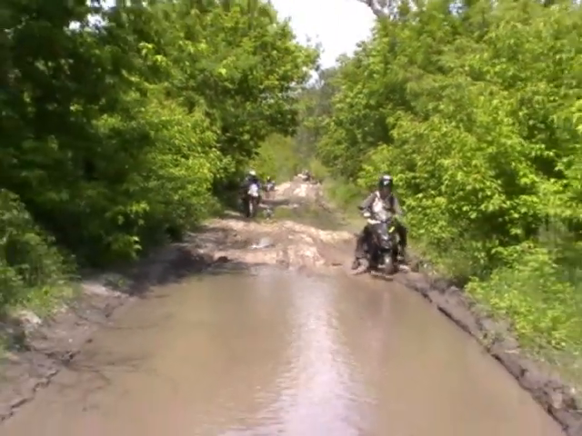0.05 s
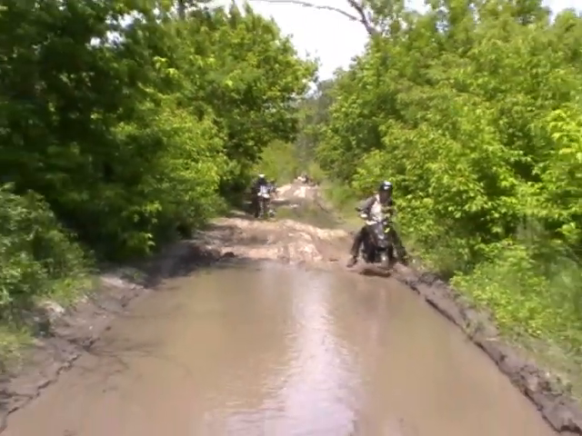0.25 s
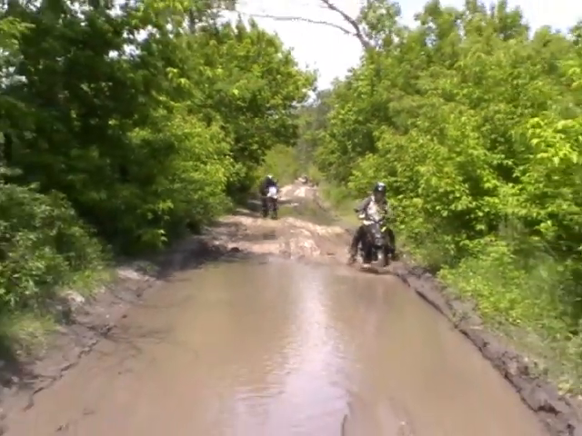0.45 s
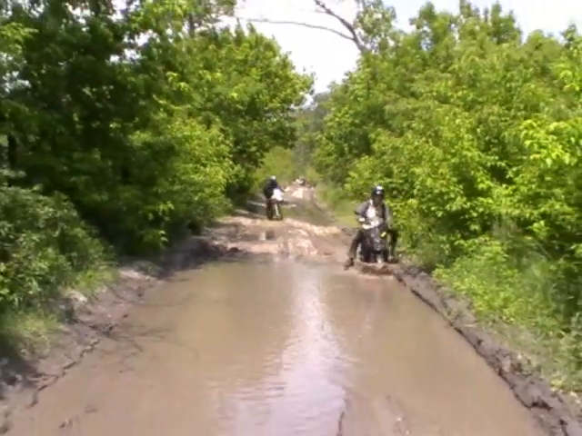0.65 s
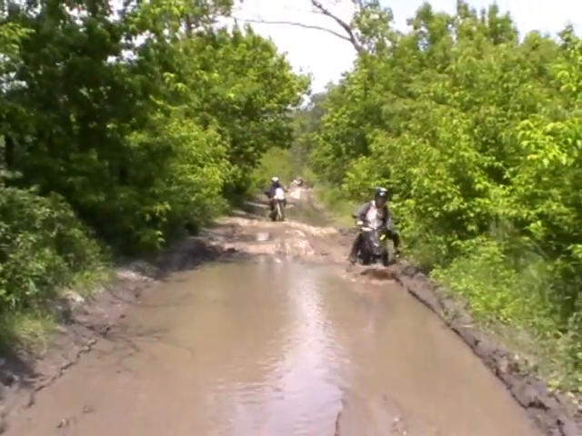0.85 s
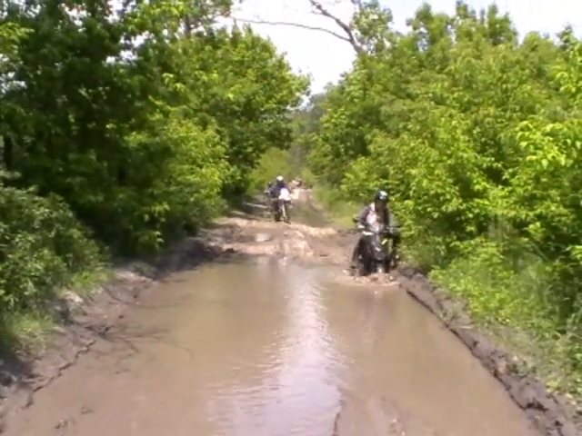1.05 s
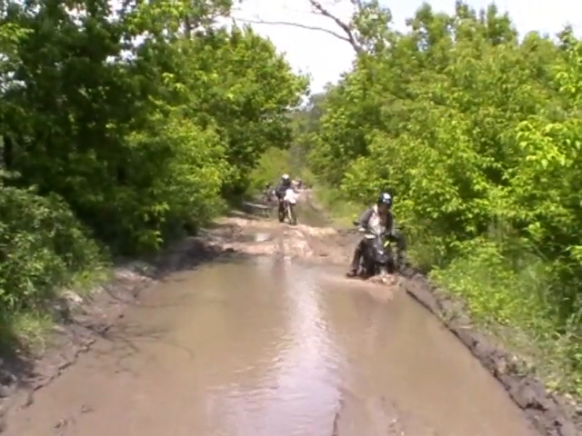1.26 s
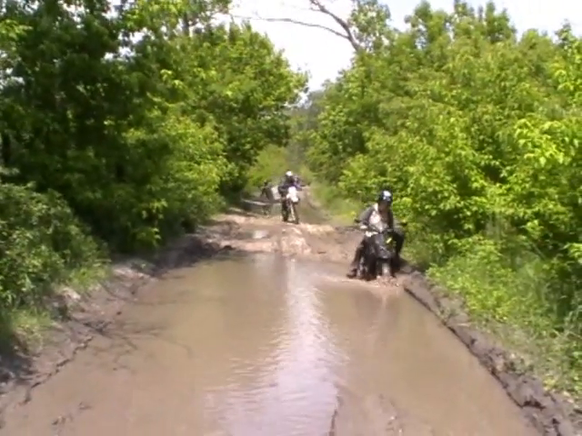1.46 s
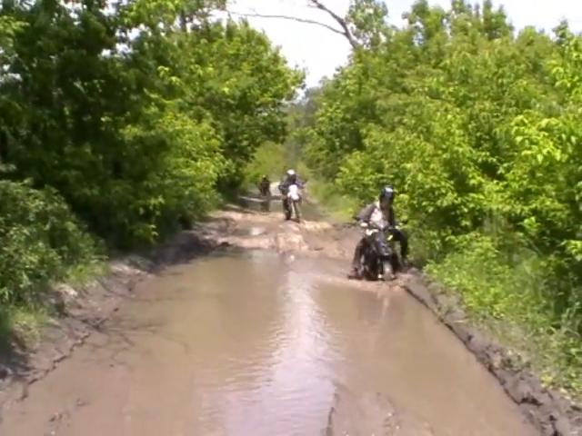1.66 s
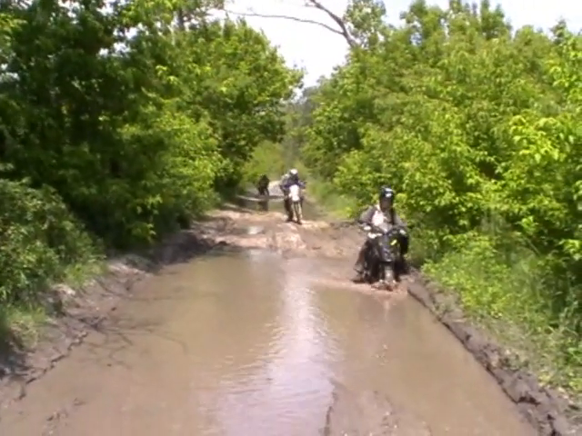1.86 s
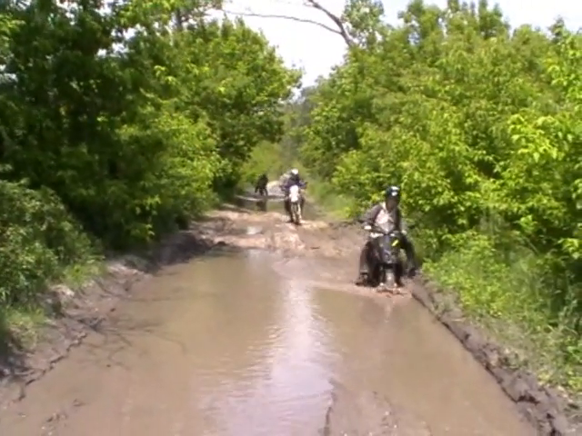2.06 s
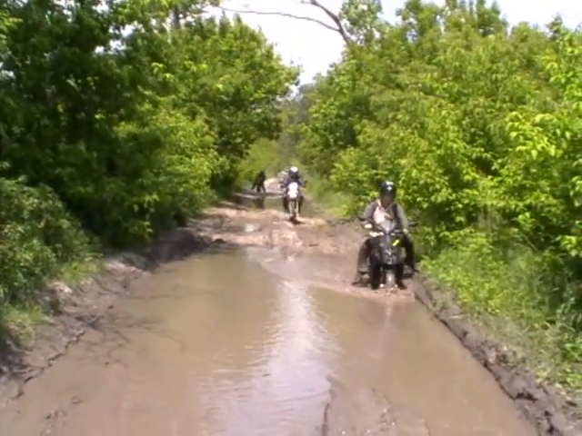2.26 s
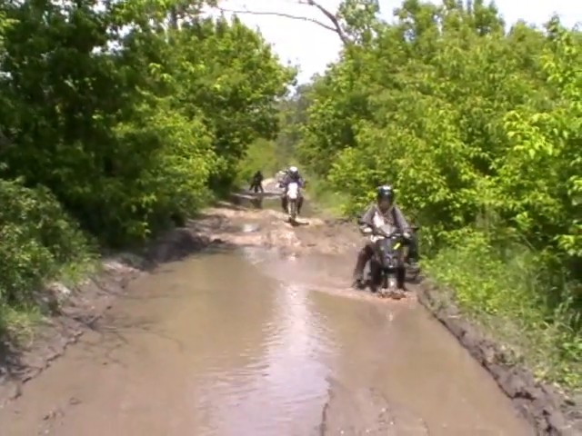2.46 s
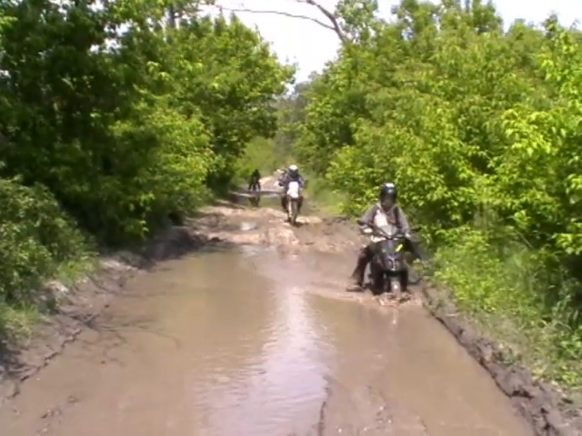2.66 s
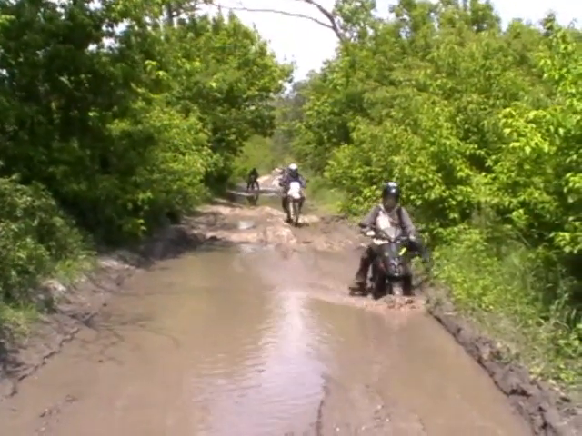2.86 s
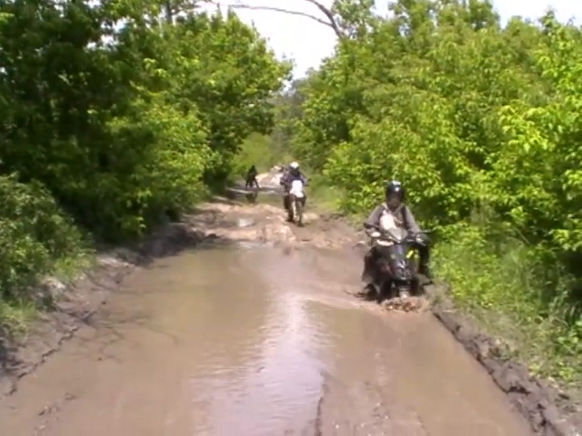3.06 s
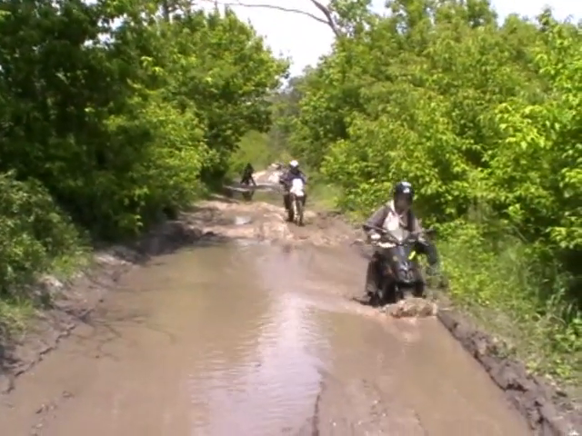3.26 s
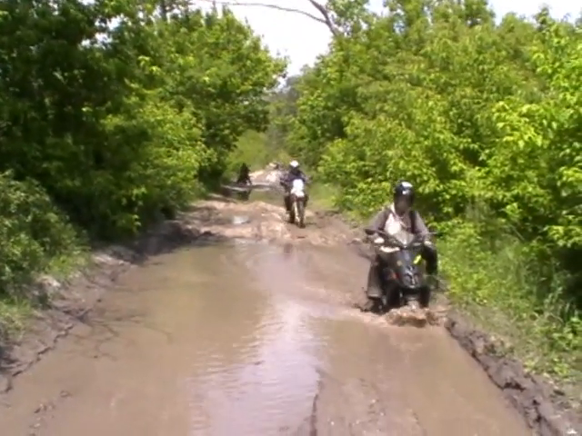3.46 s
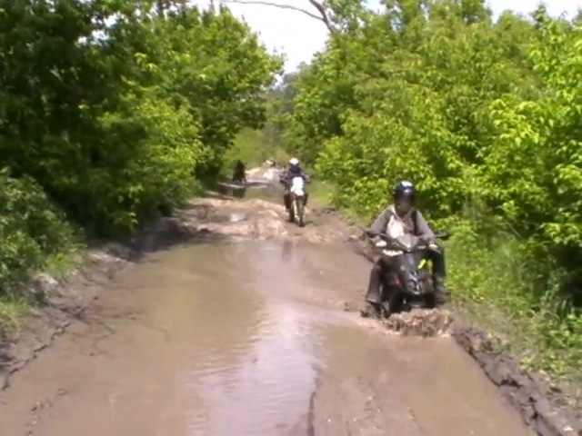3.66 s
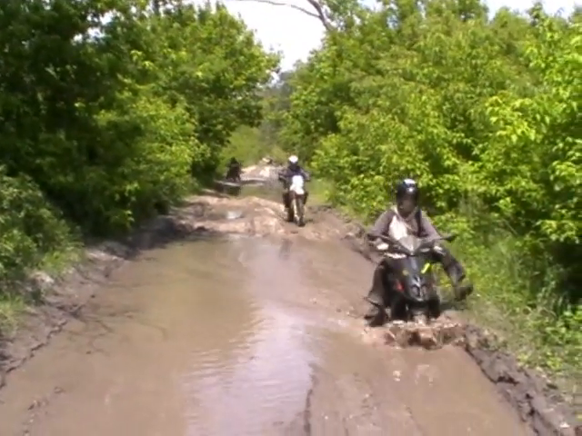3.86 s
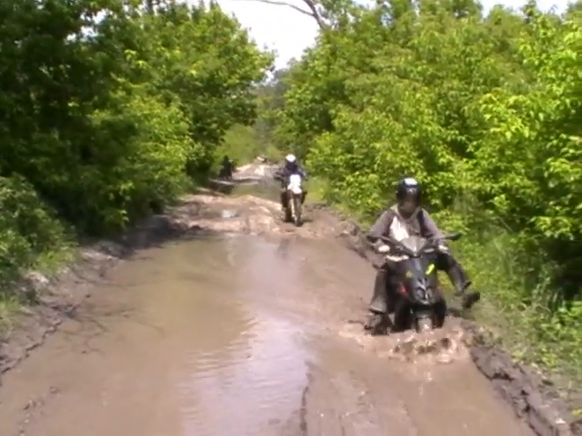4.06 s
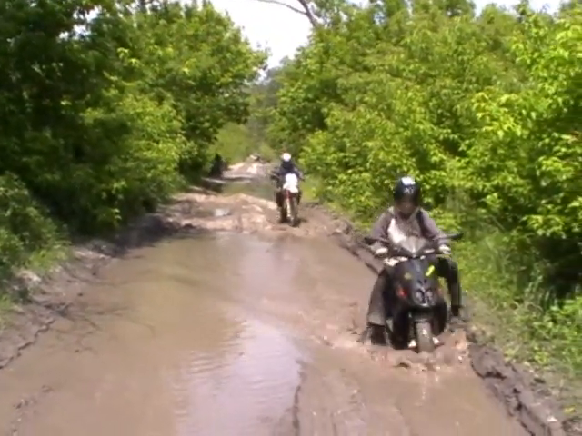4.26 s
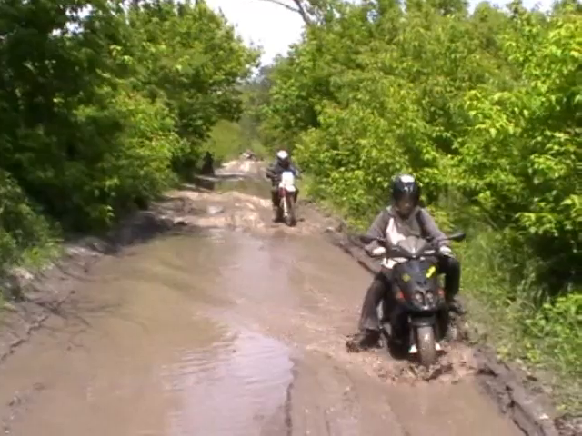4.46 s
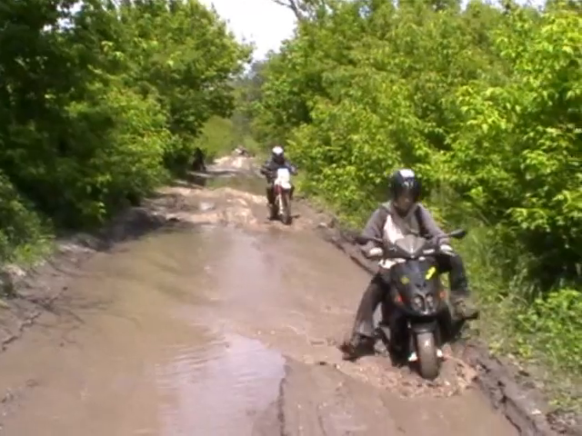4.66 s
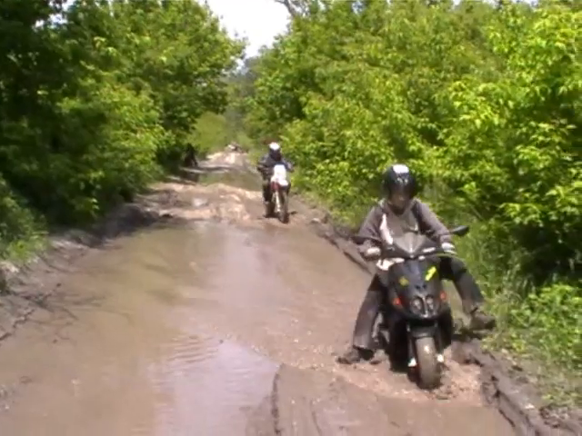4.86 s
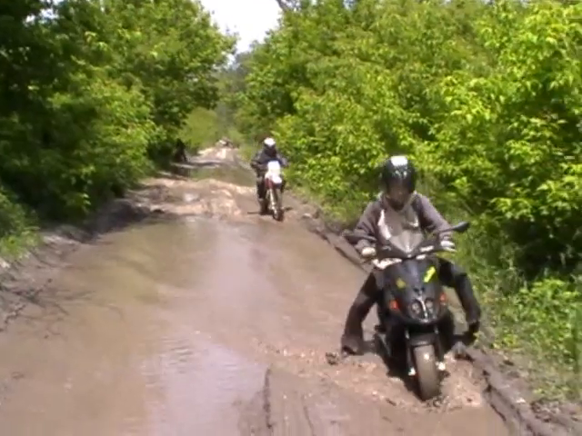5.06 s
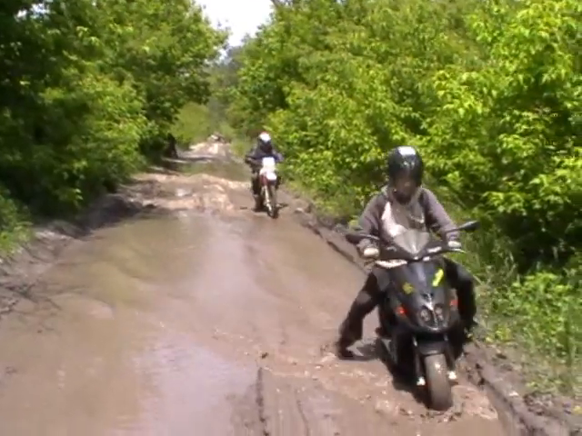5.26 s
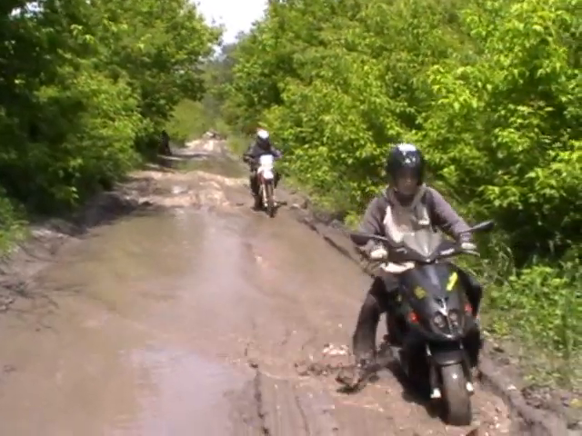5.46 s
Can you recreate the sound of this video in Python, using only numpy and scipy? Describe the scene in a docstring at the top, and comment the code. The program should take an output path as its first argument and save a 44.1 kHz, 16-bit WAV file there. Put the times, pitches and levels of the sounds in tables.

```python
"""On a forest track, a two-stroke scooter wades through a long muddy puddle towards two microphone ports.
Its silencer booms on the five lowest crank orders, as sine tones; pulses locked to the crank make the
exhaust rasp and the intake bark, and random clicks clatter on the casing.
Filtered noise and gliding bubbles churn round the wheels, and fine clicks and hiss make the spray.
A trail bike putters further back as pulses ringing a pipe, and the bushes scatter a short diffuse tail."""
import sys
import numpy as np
from scipy import signal
from scipy.fft import rfft, irfft
from scipy.io import wavfile
from scipy.ndimage import uniform_filter1d

SR = 44100
rng = np.random.default_rng(int(sys.argv[2]) if len(sys.argv) > 2 else 0)


def digitize_waveform(pressure):
    """Quantize a signal to 16-bit integers and store it at the path in sys.argv[1].

    Rows of a 2-D input are taken as channels; values are limited to [-1, 1].
    """
    field = np.atleast_2d(pressure).T
    bounded = np.clip(field, -1, 1)
    quanta = np.round(bounded * 32767).astype(np.int16)
    wavfile.write(sys.argv[1], SR, quanta)


N = 243014

REFERENCE_M = 5  # distance at which the layer levels hold


def undb(db):
    """Decibels to gain."""
    return 10 ** (np.asarray(db) / 20)


def unit(x):
    """Scale to rms 1."""
    return x / np.sqrt(np.mean(x ** 2))


def curves(table):
    """Each column of a timed table, one value per sample."""
    seconds, *columns = np.transpose(table)
    return [np.interp(np.arange(N) / SR, seconds, column) for column in columns]


def colour(x, points):
    """Filter by (Hz, dB) points joined on a logarithmic frequency axis; rms 1."""
    hz, db = np.transpose(points)
    bins = np.maximum(np.arange(N // 2 + 1) * SR / N, 1)
    gain = undb(np.interp(np.log(bins), np.log(hz), db))
    return unit(irfft(rfft(x) * gain, N))


def resonate(x, hz, width_hz):
    """One resonance, gain 1 at its centre."""
    return signal.lfilter(*signal.iirpeak(hz, hz / width_hz, fs=SR), x)


def ring(x, modes):
    """Sum of (Hz, width Hz, dB) modes; two passes at twice the width give each steeper skirts."""
    total = 0
    for hz, width_hz, db in modes:
        once = resonate(x, hz, 2 * width_hz)
        total = total + undb(db) * resonate(once, hz, 2 * width_hz)
    return unit(total)


def walk(rate):
    """Smooth chance that changes about rate times a second; spread 1."""
    hold = max(int(SR / rate), 1)
    steps = np.repeat(rng.standard_normal(N // hold + 1), hold)
    return unit(uniform_filter1d(steps, hold)[:N])


def clicks(rate, spread_db):
    """Random tiny impacts, rate per second: many weak, a few strong."""
    hit = rng.random(N) < rate / SR
    size = undb(spread_db * np.minimum(rng.exponential(size=N), 4))
    return unit(hit * size * rng.choice([-1, 1], N))


def pulses(turns, scatter_db):
    """One pulse of uneven strength per whole turn, shared between two samples."""
    size = undb(scatter_db * rng.standard_normal(N))
    at = np.flatnonzero(np.diff(np.floor(turns)) > 0)
    # share of the step that lies past the whole turn
    late = (turns[at + 1] % 1) / (turns[at + 1] - turns[at])
    out = np.zeros(N)
    out[at] += size[:len(at)] * late
    out[at + 1] += size[:len(at)] * (1 - late)
    return out


def place(x, pan_db):
    """Set a source left (+) or right (-) by the level difference between the sides."""
    return x * undb(np.array([[pan_db], [-pan_db]]) / 2)


def order_levels(hz, throttle, metres):
    """Levels of crank orders 2 to 5 in dB: each slides along the silencer's response as the speed changes."""
    # The exhaust note ahead of the silencer's response. Each row: time in seconds, level in dB.
    exhaust_level = [(0, -43.6), (.39, -41), (.58, -31), (1.05, -29.5), (1.7, -31), (2.55, -28.8),
                     (3.03, -26), (3.16, -23), (3.57, -27), (3.9, -21), (4.3, -24), (5.5, -22)]
    # What the silencer lets through. Each row: frequency in Hz, gain in dB.
    silencer_colour = [(115, -11), (140, -6.5), (160, -1), (172, -2), (205, -4.5), (240, -7.5), (280, -6),
                       (320, -9), (342, -12), (370, -14.3), (420, -24.5)]
    # Change from shut to full throttle, in dB for orders 2 to 5: load lifts 2, 4 and 5 and sinks 3.
    order_swing_db = [10.5, -15, 15.5, 14]
    # Change from the far end of the approach to the near one as the angle turns, in dB for orders 2 to 5.
    order_near_db = [-3.5, .5, 4, -8.5]
    # Depth of chance fading over the rippling water, in dB for orders 2 to 5.
    order_fade_db = [.15, .45, .8, 1.6]
    note_db, = curves(exhaust_level)
    at_hz, pass_db = np.transpose(silencer_colour)
    closeness = REFERENCE_M / metres
    closeness = (closeness - closeness.mean()) / np.ptp(closeness)
    levels = []
    for k, (swing_db, near_db, fade_db) in enumerate(zip(order_swing_db, order_near_db, order_fade_db), 2):
        silenced_db = note_db + np.interp(np.log(k * hz), np.log(at_hz), pass_db)
        balance_db = swing_db * (throttle - .5) + near_db * closeness
        levels.append(silenced_db + balance_db + fade_db * walk(7))
    return levels


def boom(turns, hz, order_db, flutter_db, uneven_db, first_order_db):
    """The silencer passes only the lowest crank orders; uneven burning makes them flutter."""
    resonance_hz, width_hz = 206, 28
    # order 1 follows the stronger of orders 2 and 3
    levels = [np.maximum(order_db[0], order_db[1]) + first_order_db] + order_db
    tones = 0
    for k, db in enumerate(levels, 1):
        # an order's phase turns as it crosses the silencer's main resonance
        lag = np.arctan(2 * (k * hz - resonance_hz) / width_hz)
        dispersion = 1.7 * k ** 2  # radians
        gain = undb(db + flutter_db * walk(45))
        tones = tones - gain * np.sin(2 * np.pi * k * turns - lag - dispersion)
    return np.sqrt(2) * tones * undb(uneven_db * walk(32))


def chambers(x, reflect):
    """Allpass echoes inside the silencer spread each crack over milliseconds without colouring it."""
    # Round trips of the silencer's chambers, in seconds.
    round_trips = [.0007, 0.00131, .0021]
    for trip in round_trips:
        taps = np.r_[1, np.zeros(int(trip * SR)), reflect]
        x = signal.lfilter(taps[::-1], taps, x)
    return x


def reflections(x, strength, count):
    """Paths by way of the rippling water and the banks come and go, so overtones swell and fade."""
    lags = (rng.uniform(0.00186, .03, count) * SR).astype(int)
    echoes = sum(walk(4.05) * np.r_[np.zeros(lag), x[:-lag]] for lag in lags)
    return unit(x + strength * echoes)


def port_cracks(turns, jitter, scatter_db, intake_db, echo):
    """The exhaust port cracks open once a turn and the intake half a turn later."""
    rough = turns + jitter * walk(160)
    exhaust = pulses(rough, scatter_db)
    intake = undb(intake_db) * pulses(rough + .5, scatter_db)
    return reflections(chambers(exhaust + intake, reflect=0.55), echo, count=5)


def rasp(cracks):
    """The port cracks leave the exhaust as a midrange buzz locked to the crank."""
    # Spectral shaping of the rasp. Each row: frequency in Hz, gain in dB.
    rasp_colour = [(330, -25), (490, -1.5), (670, 5.5), (850, 3), (1000, -4), (1300, -2), (1750, -9.5),
                   (2300, -40), (4200, -55)]
    return colour(cracks, rasp_colour)


def bark(cracks):
    """The firings ring the intake and the plastic cowling, heard from close by."""
    # Resonances of intake and cowling. Each row: frequency in Hz, nominal width in Hz, gain in dB.
    cowl_modes = [(886, 97.5, -3.5), (1046, 230, -7.5), (1362, 68, -7), (1647, 59, -4.5), (1912, 83, -4.5),
                  (3190, 120, -8.5), (4967, 84, -26)]
    return ring(cracks, cowl_modes)


def clatter(turns, depth, flicker_db):
    """Piston, belt and flung grit rattle the engine casing, a little harder around each firing."""
    # Spectral shaping of the casing. Each row: frequency in Hz, gain in dB.
    casing_colour = [(500, -21), (900, -4), (1250, 0.5), (1600, -3), (2000, -2), (2350, 2), (2620, -6),
                     (2820, -2), (3020, 3), (3300, -2), (3600, -9.5), (3900, -16), (4300, -32.5),
                     (6000, -31)]
    gate = 1 + depth * np.cos(2 * np.pi * turns)
    knocks = clicks(rate=9000, spread_db=2.5) * gate
    return colour(knocks, casing_colour) * undb(flicker_db * walk(30))


def surges():
    """Surges and lulls, in dB, as the wheels and the rider's boots plough through the water."""
    # Bell-shaped swells. Each row: peak in seconds, change of the spray in dB, time to fall to 1/e in seconds.
    plunges = [(0, 1.5, .07), (0.276, -3.5, 0.24), (1.1, 2, 0.47), (1.761, 2, 0.11), (2.878, 2, 0.074),
               (3.48, 3.5, 0.057), (3.72, 3.5, 0.05), (4.05, 4.5, 0.098), (4.16, 4.5, 0.043),
               (4.42, 2, 0.21)]
    t = np.arange(N) / SR
    return sum(db * np.exp(-((t - peak) / half) ** 2) for peak, db, half in plunges)


def bubbles(low_hz, high_hz, cycles, spread_db, count):
    """Air pockets that ring briefly, their pitch gliding up as they surface."""
    out = np.zeros(N)
    for when, pitch, chance in rng.random((count, 3)):
        hz = low_hz * (high_hz / low_hz) ** pitch
        start = int(when * N)
        t = np.arange(min(int(cycles / hz * SR), N - start)) / SR
        age = t * hz / cycles  # 0-1 over the bubble's life
        size = undb(-spread_db * np.log(max(chance, .03)))
        tone = np.sin(2 * np.pi * hz * t * (1 + age / 10))
        out[start:start + len(t)] += size * tone * np.exp(-np.log(100) * age)
    return unit(out)


def churn(turns, bubble_db, depth, unrest_db):
    """Muddy water boils round the wheels while exhaust gas puffs through it with each turn."""
    # Spectral shaping of the muddy water. Each row: frequency in Hz, gain in dB.
    water_colour = [(40, -30), (90, -8), (150, -1), (280, 2), (410, -8), (520, -4), (720, -3), (950, -7),
                    (1300, -16), (2200, -16), (4000, -36)]
    puffs = rng.standard_normal(N) * (1 + depth * np.cos(2 * np.pi * turns))
    gurgle = bubbles(low_hz=380, high_hz=1800, cycles=12, spread_db=2.5, count=1500)
    water = colour(puffs, water_colour) + undb(bubble_db) * colour(gurgle, water_colour)
    return unit(water) * undb(unrest_db * walk(22.32))


def spray(spray_db, mist_db, width_db, flicker_db):
    """Droplets patter back onto the puddle; a layer opposed between left and right widens them."""
    # Spectral shaping of the droplets. Each row: frequency in Hz, gain in dB.
    drop_colour = [(2500, -32), (4300, -3), (5050, 3.5), (5500, 3), (6200, 3.5), (7800, 1.5), (9500, 4.5),
                   (10600, 0), (13500, 2.5), (14200, -9), (16000, -15)]
    patter = clicks(rate=1800, spread_db=4.0)
    mist = undb(mist_db) * rng.standard_normal(N)
    drops = colour(patter + mist, drop_colour)
    side_colour = [(2000, 2.5), (3500, 3), (5000, 7.5), (9000, -0.5), (16000, -10)]
    sides = colour(clicks(rate=6000, spread_db=1.5), side_colour)
    both = place(drops, pan_db=1.5) + undb(width_db) * sides * np.array([[1], [-1]])
    return both * undb(spray_db + flicker_db * walk(30))


def spurts():
    """Short, bright hisses of flung water: noise with a sharp rise and a quick decay."""
    # Single spurts of fine spray. Each row: peak in seconds, level in dB, decay in seconds.
    hisses = [(.044, -53, .004), (.519, -51, .006), (2.141, -42.5, .008), (3.45, -52, .02)]
    # Spectral shaping of the hiss. Each row: frequency in Hz, gain in dB.
    hiss_colour = [(3000, -10), (6000, -6), (13300, 3), (16000, -12)]
    t, rise = np.arange(N) / SR, 0.0017  # s
    gain = 0
    for peak, db, decay in hisses:
        gain = gain + undb(db) * np.exp(-np.maximum((t - peak) / decay, (peak - t) / rise))
    return gain * colour(rng.standard_normal(N), hiss_colour)


def whine():
    """A thin, slightly unsteady gear tone, faintest after the first second."""
    # The gear tone. Each row: time in seconds, frequency in Hz, level in dB.
    gear_tone = [(0, 1750, -55), (.45, 1826, -57), (1, 1810, -66)]
    hz, db = curves(gear_tone)
    cycles = np.cumsum(hz * (1 + 0.00335 * walk(56))) / SR
    return np.sqrt(2) * undb(db) * np.sin(2 * np.pi * cycles)


def trail_bike():
    """A distant four-stroke on low throttle: lumpy firings ring its pipe."""
    # The bike behind. Each row: time in seconds, firing rate in Hz, level in dB before a 5 dB cut.
    putter = [(0, 32.8, -40.5), (.4, 33.54, -42), (1.2, 32.04, -38), (3, 33.89, -39), (5.51, 31.95, -46)]
    # Its exhaust resonances. Each row: frequency in Hz, nominal width in Hz, gain in dB.
    pipe_modes = [(523.4, 44, -1), (607, 37.5, 1), (746, 97, -8)]
    hz, db = curves(putter)
    firings = pulses(np.cumsum(hz * (1 + 0.0201 * walk(12))) / SR, scatter_db=-1.5)
    return ring(firings, pipe_modes) * undb(db - 5)


def bushes(x, t60, wet_db):
    """Leaves and trunks scatter a short diffuse tail (t60 in seconds), different at each ear."""
    t = np.arange(SR // 2) / SR
    tails = rng.standard_normal((2, len(t))) * np.exp(-np.log(1000) * t / t60)
    tails /= np.sqrt(np.sum(tails ** 2, axis=1, keepdims=True))
    return x + undb(wet_db) * signal.fftconvolve(x, tails, axes=1)[:, :N]


def scene():
    """Crank speed and throttle drive the engine; distance, revs and surges set how loud its layers are."""
    # The scooter's engine speed. Each row: time in seconds, firing rate in Hz.
    speed = [(0.0, 56.1), (0.14, 57.5), (0.4, 59.2), (0.6, 67.95), (0.8, 69.73), (1.27, 69.97),
             (1.55, 78.92), (1.84, 83.8), (2.15, 83.3), (2.53, 85.84), (2.75, 82.27), (3.1, 79.9),
             (3.35, 81.5), (3.53, 85.2), (3.67, 83.26), (3.9, 76.8), (4.0, 70.2), (4.1, 68.05),
             (4.26, 68.13), (4.47, 74.9), (4.66, 65.4), (4.99, 76.32), (5.2, 82.1), (5.51, 86.34)]
    # The rider's hand. Each row: time in seconds, throttle from 0 to 1.
    throttle_hand = [(0, 0.35), (1.26, 0.3), (1.42, 0.72), (1.82, 0.76), (2.58, 0.58), (2.76, 0.36),
                     (3.44, 0.28), (3.5, 0.55), (3.81, 0.25), (4.26, 0.47), (4.36, 0.59), (4.47, 0.66),
                     (4.55, 0.06), (4.73, 0.56), (5.1, 0.68), (5.5, 0.86)]
    # The approach. Each row: time in seconds, distance in metres.
    approach = [(0, 16.3), (2, 13.4), (3, 11.6), (4, 9.2), (5, 6.75), (5.5, 4.84)]
    # Midrange power locked to the firings. Each row: time in seconds, exhaust rasp 0-1, intake bark 0-1.
    load = [(0, 0, 0), (1.3, 0.45, 0), (1.8, 0.48, 0.01), (2.6, 0.4, 0.02), (3.1, 0.17, 0.03),
            (4.7, 0.17, 0.13), (5.05, 0.16, 0.32), (5.3, 0.12, 0.4)]
    hz, = curves(speed)
    metres, = curves(approach)
    throttle, = curves(throttle_hand)
    rasping, barking = curves(load)
    watery = 1 - rasping - barking

    # each layer: dB at the reference distance, 75 Hz and half throttle, then its rise in dB per Hz of revs
    near_db = 20 * np.log10(REFERENCE_M / metres)
    revs, surge_db, pull = hz - 75, surges(), throttle - .5
    rasp_db = -30 + near_db + 0.2453 * revs + 2.5 * pull
    bark_db = -31 + near_db + 0.28 * revs
    # surges reach the grit on the casing and the churning only in part
    clatter_db = -32 + near_db + 0.038 * revs + 0.5 * pull + 0.71 * surge_db
    churn_db = -30 + near_db + 0.0877 * revs + .25 * surge_db
    spray_db = -48 + near_db + 0.01 * revs + surge_db

    turns = np.cumsum(hz * (1 + 0.001875 * walk(40))) / SR
    orders = order_levels(hz, throttle, metres)
    low = boom(turns, hz, orders, flutter_db=0.59, uneven_db=0.38, first_order_db=-31.0)
    cracks = port_cracks(turns, jitter=0.0032, scatter_db=3.0, intake_db=-9.5, echo=0.25)
    edge = rasp(cracks) * np.sqrt(rasping) * undb(rasp_db)
    gulps = port_cracks(turns, jitter=0.001, scatter_db=2.5, intake_db=-5.0, echo=0.16)
    cowl = bark(gulps) * np.sqrt(barking) * undb(bark_db)
    casing = clatter(turns, depth=0.081, flicker_db=0.7) * np.sqrt(1 - barking / 2) * undb(clatter_db)
    water = churn(turns, bubble_db=-4, depth=0.38, unrest_db=1.84) * np.sqrt(watery) * undb(churn_db)
    track = place(edge + casing + water + trail_bike() + whine(), pan_db=2.0)
    scattered = bushes(track, t60=0.5, wet_db=-13.5)
    drops = spray(spray_db, mist_db=3.3, width_db=-4.5, flicker_db=0.94)
    # the cowling faces the microphone and reaches it directly
    return low + place(cowl, pan_db=1.5) + scattered + drops + spurts()


def record(dry):
    """Two microphone ports hear the track slightly out of step; a steep low-pass cuts the top."""
    # Phase between the ports. Each row: frequency in Hz, lead of the left in radians.
    port_lead = [(40, 0.66), (150, 0.39), (300, 0.22), (2000, 0.22), (6000, 0.55)]
    hz, lead = np.transpose(port_lead)
    bins = np.maximum(np.arange(N // 2 + 1) * SR / N, 1)
    half = np.interp(np.log(bins), np.log(hz), lead) * np.array([[.5], [-.5]])
    heard = irfft(rfft(dry) * np.exp(1j * half), N)
    top_hz = 15800
    return signal.sosfilt(signal.ellip(10, .2, 90, top_hz, fs=SR, output="sos"), heard)


dry = scene()
out = record(dry)
digitize_waveform(out)
```